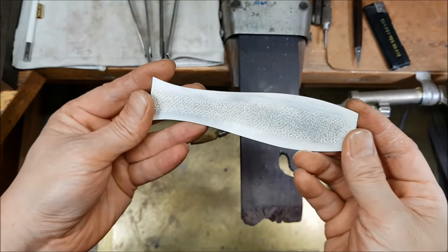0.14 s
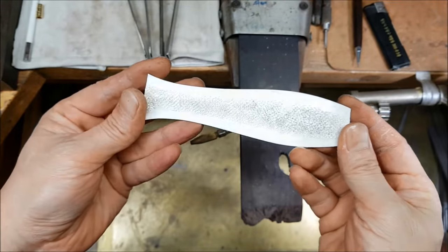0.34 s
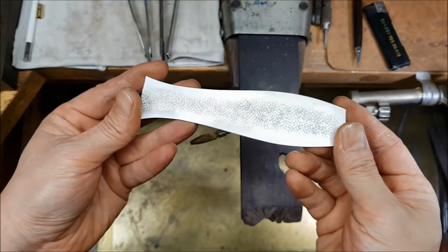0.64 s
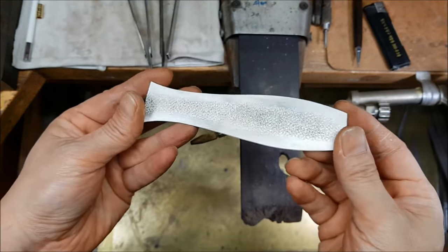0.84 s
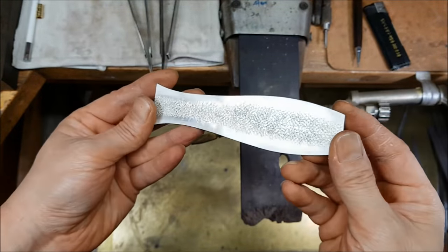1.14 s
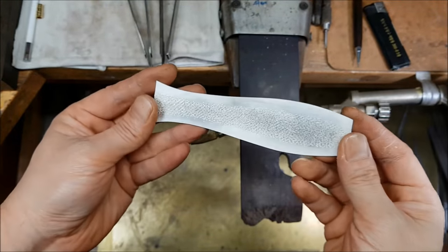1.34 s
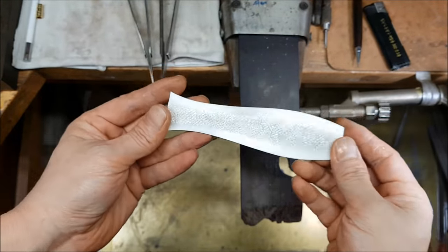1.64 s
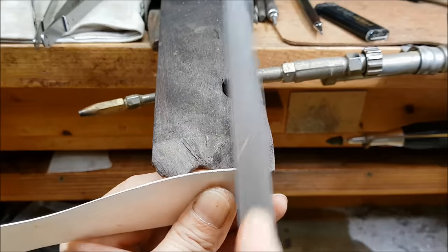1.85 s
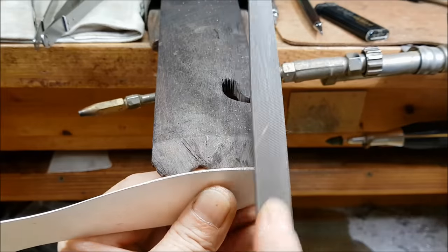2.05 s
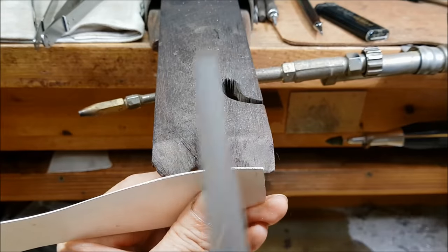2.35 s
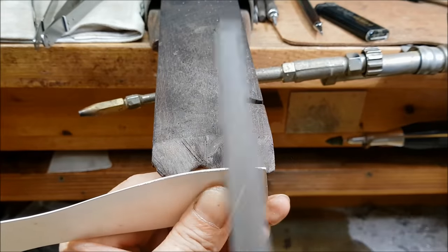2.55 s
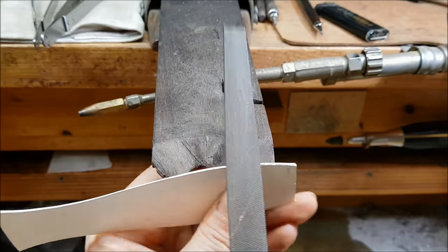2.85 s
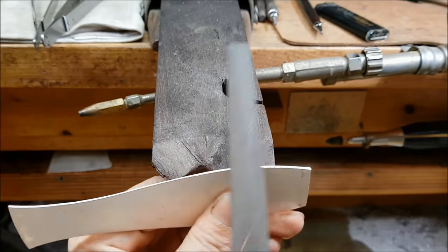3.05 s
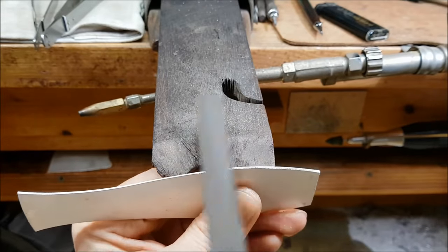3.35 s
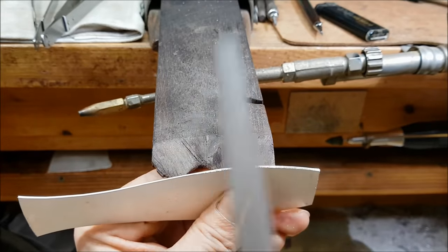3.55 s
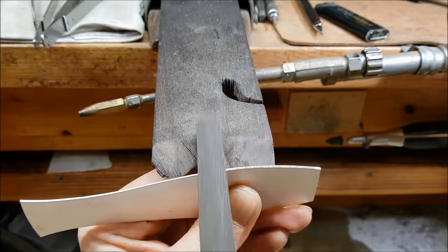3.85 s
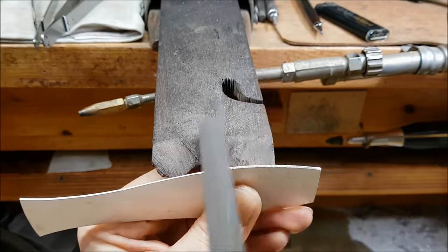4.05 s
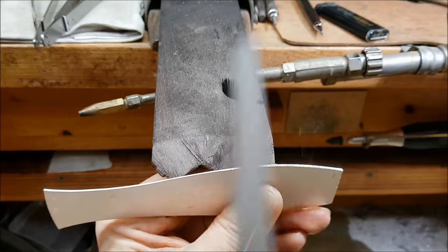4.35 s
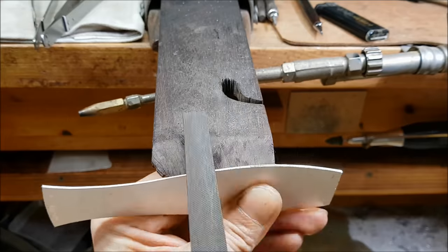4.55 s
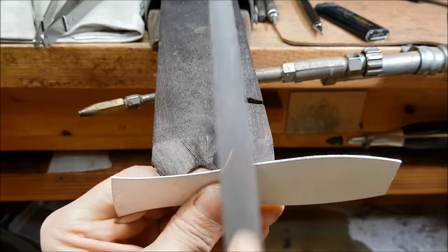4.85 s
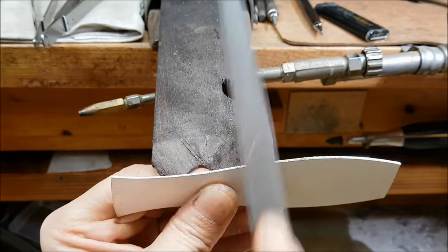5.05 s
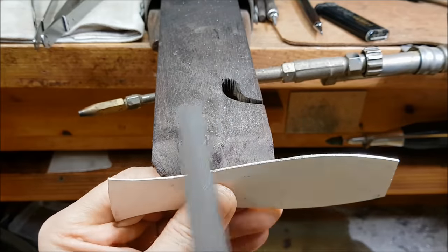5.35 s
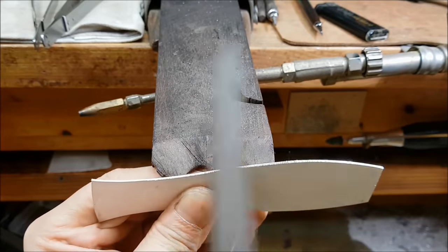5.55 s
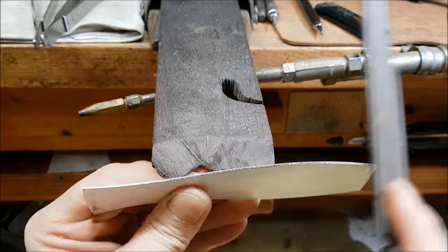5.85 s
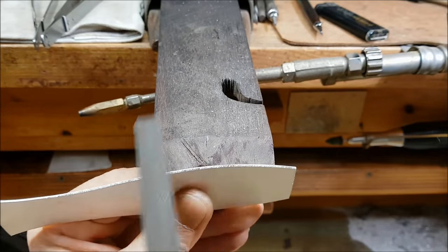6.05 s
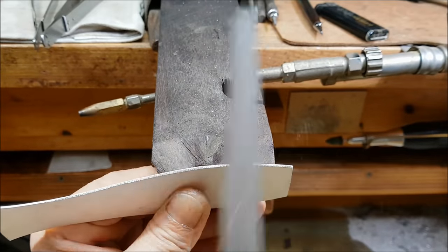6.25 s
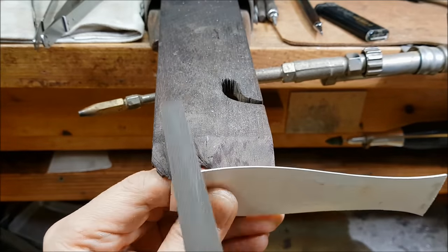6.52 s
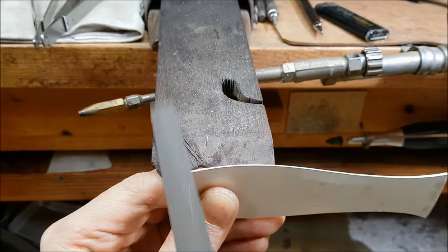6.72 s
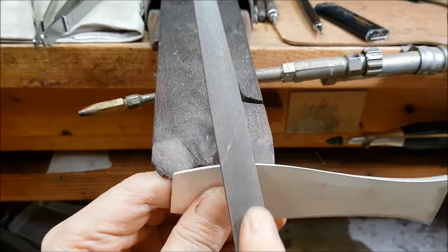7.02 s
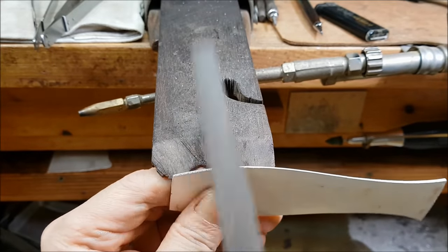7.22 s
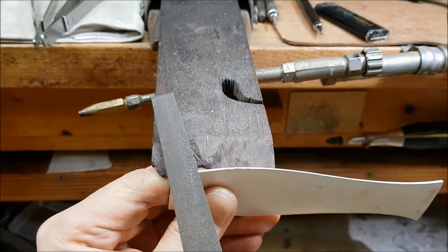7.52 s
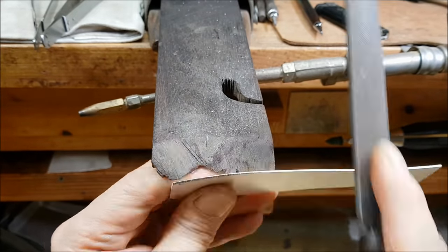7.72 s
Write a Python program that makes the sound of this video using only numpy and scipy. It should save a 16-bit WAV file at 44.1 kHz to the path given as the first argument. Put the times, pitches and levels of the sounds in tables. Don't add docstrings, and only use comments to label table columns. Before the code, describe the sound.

Nearly silent workshop with low hum and two faint double clock ticks, then an abrupt cut to close, loud filing: a hand file rasps to and fro on a thin metal sheet, ringing and hissing. A lift and a tap interrupt it, then steady strokes resume. After another cut the grip is changed, duller and faster, ending with woody slaps against the bench pin. Close stereo microphone, small dry room.

```python
import sys
import numpy as np
from scipy import signal
from scipy.fft import rfft, irfft, next_fast_len
from scipy.io import wavfile
from scipy.ndimage import uniform_filter1d, map_coordinates

SR = 44100
rng = np.random.default_rng(int(sys.argv[2]) if len(sys.argv) > 2 else 0)


def rack_gain(trim_db):
    fader = np.asarray(trim_db, float)
    return 10 ** (fader / 20)


def file_out(sig):
    cols = np.atleast_2d(sig).T
    lim = np.clip(cols, -1, 1)
    pcm = np.round(lim * 32767).astype(np.int16)
    wavfile.write(sys.argv[1], SR, pcm)


N = 347508
TIME = np.arange(N) / SR
REGRIP = 4.83
# fade begins t/s, silent t/s, sound returns t/s
MUTES = [
    (1.76, 1.765, 1.795),
    (4.80, 4.829, 4.831),
    (5.965, 5.972, 6.0),
    (6.598, 6.605, 6.634),
]
# f/Hz, width/Hz, level/dB
SHEET = [
    [(612, 20, 0), (754, 34, -4.5), (941, 30, 0), (1232, 146, 0.5), (1460, 30, 0.5), (1733, 30, 2), (2172, 72, 1), (2495, 69, -2.5), (2970, 210, -5.5), (3430, 170, 3.5), (4530, 270, -0.5)],
    [(620, 60, -13), (977, 58, 2), (1427.7, 81, -2.5), (1772, 154.4, -2), (2255, 44, -0.5), (2577, 53, -0.5), (3250, 250, -6), (3540, 150, -6), (4470, 235, 1.5)],
]
# f/Hz, width/Hz, level/dB
PIN = [(157, 110, -2.5), (287.5, 95, 1.5), (425, 116, 1.5), (643, 40, 0.5), (940, 290, -2.5)]
# f/Hz, t60/s
ROOM = [(200, 0.27), (2000, 0.078), (12000, 0.05)]


def unit(x):
    return x / np.sqrt(np.mean(x ** 2) + 1e-20)


def along(points, hz):
    f, v = np.transpose(points)
    return np.interp(np.log(hz + 1), np.log(f + 1), v)


def filtered(x, response):
    m = next_fast_len(N + 8192)
    return irfft(rfft(x, m) * response(np.fft.rfftfreq(m, 1 / SR)), m)[..., :N]


def coloured(noise, colour):
    return unit(filtered(noise, lambda hz: rack_gain(along(colour, hz))))


def modes(table):
    def response(f):
        total = 0
        for k, (centre, width, db) in enumerate(table):
            resonance = 1j * f * width / (centre * centre - f * f + 1j * f * width)
            total = total + (-1) ** k * rack_gain(db) * resonance
        return total
    return response


def even(response):
    def scaled(hz):
        gain = response(hz)
        return gain / np.sqrt(np.mean(np.abs(gain) ** 2))
    return scaled


def impulses(s, sizes):
    at = np.asarray(s)[:, None] * SR
    index = np.floor(at).astype(int) + np.arange(-5, 7)
    kernel = np.sinc(index - at) * np.cos(np.pi * (index - at) / 14) ** 2
    weights = kernel * np.asarray(sizes)[:, None]
    return np.bincount(np.clip(index, 0, N - 1).ravel(), weights.ravel(), N)


def bursts(events):
    envelope = 0
    for s, db, rise, t60 in events:
        decay = rack_gain(db - 60 * np.abs(TIME - s) / t60)
        envelope = envelope + decay * np.clip((TIME - s) / rise, 0, 1)
    return envelope * rng.standard_normal((2, N))


def reverb(x, decay):
    hz, t, z = signal.stft(rng.standard_normal((2, SR // 3)), SR, nperseg=128)
    tail = signal.istft(z * rack_gain(-60 * t / along(decay, hz)[:, None]), SR, nperseg=128)[1]
    return signal.oaconvolve(x, tail / np.linalg.norm(tail[0]), axes=1)[:, :N]


def hum():
    # t/s, level/dB
    hum_level = [(0, -72.5), (1.77, -70.5), (1.8, -62.5), (2.4, -65), (2.7, -57), (3.3, -60), (3.6, -66),
                 (4.6, -61.5), (5.2, -72), (6.9, -68.5), (7.1, -91), (7.88, -80.5)]
    # f/Hz, level/dB per Hz
    hum_colour = [(20, -72.5), (50, -29.5), (97, -13), (172, -14), (210, -21.5), (500, -38), (780, -72.5),
                  (1320, -120)]
    # f/Hz, level/dB per Hz
    rumble_colour = [(10, -30), (25, -14), (50, 3), (80, -2), (130, -40), (300, -120)]
    common = rng.standard_normal(N)
    steady = coloured(rng.standard_normal((2, N)) + 1.5 * common, hum_colour)
    steady = steady * rack_gain(np.interp(TIME, *np.transpose(hum_level)))
    wide_shot = TIME < MUTES[0][1]
    rumble = rack_gain(-73) * wide_shot * coloured(rng.standard_normal(N), rumble_colour)
    return (rumble + steady) * rack_gain([[-2.1], [2.1]])


def still_air():
    # t/s, level/dB
    air_level = [
        (0, -80.5),
        (1.77, -80),
        (1.8, -63),
        (2.9, -59.5),
        (3.05, -66.5),
        (4.8, -71.5),
        (5.95, -71),
        (7.88, -82),
    ]
    # f/Hz, level/dB per Hz
    air_colour = [(300, -4), (500, -2), (1500, -4), (5000, -9), (9000, -9), (16000, -11)]
    air = coloured(rng.standard_normal((2, N)), [(150, -64.0)] + air_colour)
    return air * rack_gain(np.interp(TIME, *np.transpose(air_level)))


def clock():
    # t/s, peak level/dB, rise/s, t60/s
    tick_events = [
        (.425, -67, .002, .07),
        (.446, -66, .002, 0.065),
        (1.334, -68.5, .002, 0.068),
        (1.355, -65, .002, 0.064),
    ]
    # f/Hz, width/Hz, level/dB
    clock_parts = [(1470, 43, -13), (3500, 110, -5), (3980, 40, -15), (5300, 45, -4), (6300, 86, -5),
                   (7770, 34, -7), (11500, 91, -14)]
    impact = lambda hz: 0.14 * (hz > 1200) * (hz < 8500)
    ticks = rack_gain(19.0) * filtered(bursts(tick_events), lambda hz: modes(clock_parts)(hz) + impact(hz))
    return ticks + rack_gain(1) * reverb(ticks, ROOM)


def strokes():
    # push t/s, pull t/s, push level/dB, pull level/dB, push teeth f/Hz
    bout_1 = [
        (1.788, 1.881, -23.5, -24.5, 1745),
        (1.984, 2.076, -22, -23.5, 2363),
        (2.161, 2.255, -20.5, -24, 2544),
        (2.341, 2.43, -20.0, -23.0, 2459),
        (2.523, 2.614, -20.5, -22.0, 2417),
        (2.697, 2.784, -20.5, -22, 2544),
    ]
    bout_2 = [
        (3.142, 3.237, -32.5, -23, 1676),
        (3.346, 3.444, -23, -23, 2232),
        (3.534, 3.625, -22, -21.5, 1811),
        (3.712, 3.804, -22, -23.5, 1884),
        (3.893, 3.981, -21.5, -21.0, 1882),
        (4.069, 4.158, -19.5, -22.5, 1933),
        (4.248, 4.332, -21, -21, 2047),
        (4.416, 4.501, -23.5, -22.0, 1749),
        (4.59, 4.672, -23.0, -21.0, 1671),
    ]
    bout_3 = [
        (4.801, 4.855, -38, -21, 2165),
        (4.92, 4.978, -23.5, -18.5, 2410),
        (5.036, 5.096, -23, -21, 2471),
        (5.15, 5.206, -20, -21.5, 2979),
        (5.265, 5.317, -25, -23, 2699),
        (5.378, 5.435, -24.5, -22.5, 3036),
        (5.485, 5.548, -25.5, -24.5, 2599),
        (5.602, 5.655, -22, -20, 2840),
        (5.714, 5.773, -18.5, -20.5, 2876),
        (5.82, 5.881, -21.5, -22, 2759),
    ]
    bout_4 = [
        (5.984, 6.038, -23, -23.5, 1281),
        (6.102, 6.164, -22, -22, 1852),
        (6.221, 6.283, -19.5, -22.5, 3766),
        (6.336, 6.4, -18.0, -25.0, 3783),
        (6.448, 6.508, -20.5, -26.0, 3853),
    ]
    bout_5 = [(6.606, 6.621, -67, -19.5, 3194), (6.68, 6.735, -22.5, -20.5, 3250),
              (6.791, 6.85, -21.0, -20, 3179), (6.905, 6.964, -22.0, -25.5, 3363),
              (7.024, 7.085, -24, -25.5, 3550), (7.138, 7.198, -25.0, -24.5, 3176),
              (7.254, 7.318, -23.5, -27, 3297), (7.366, 7.426, -22, -25.5, 3419),
              (7.478, 7.537, -24.5, -27, 2733), (7.588, 7.64, -24.5, -31.5, 2204),
              (7.693, 7.749, -26.5, -28.5, 3086)]
    # lift t/s, scrape at lift/dB, pull teeth f/Hz, slackening grip/dB per s, pin drone/dB
    bouts = [
        (2.854, -49, 1349, -3.8, -18.5),
        (4.782, -73, 1421, -1, -15),
        (5.936, -75, 2096, -7.5, -17.5),
        (6.557, -62, 2101, -2.7, -21),
        (7.807, -100, 1952, -6, -14.5),
    ]
    # ring/dB, rasp/dB, sizzle/dB, scrape at the turn/dB, hardest press at share 0-1
    push_mix = [(-3.5, -6.5, -11.5, -20.5, .62), (-5.5, -3.5, -6.5, -13.5, .65),
                (-1, -7.5, -4.5, -18.5, .6), (-3, -6.5, -5, -18.5, .55), (-6, -7, -4, -34, .5)]
    pull_mix = [(-3, -6.5, -0.5, -46, .6), (-5.5, -6.5, -3, -59.5, .5), (-2.5, -8, -7.5, -34, .45),
                (-5.5, -7, -3, -11, .5), (-2, -7, -8, -22, .5)]
    # ring/dB, rasp/dB, sizzle/dB
    faster = [
        (0.098, -1.5, 7.9),
        (2.5, -6.5, 0),
    ]
    usual_teeth_hz = 2200
    sizzle_gains = 0.24
    rows, scrape_db = [], -120
    for cycles, bout, push, pull in zip([bout_1, bout_2, bout_3, bout_4, bout_5], bouts, push_mix, pull_mix):
        lift, lift_db, pull_hz, fade_db, drone = bout
        per_doubling = np.array(faster[int(lift > REGRIP)])
        for out, back, push_db, pull_db, push_hz in cycles:
            pair = [(out, push_db, push_hz, push), (back, pull_db, pull_hz, pull)]
            for way, (s, db, hz, (ring, rasp, sizzle, turn, hardest)) in enumerate(pair):
                more = np.log2(hz / usual_teeth_hz) * per_doubling
                slack_db = fade_db * (s - cycles[0][0])
                ring_db = db + ring + more[0] + slack_db
                rasp_db = db + rasp + more[1]
                sizzle_db = db + sizzle + more[2] - sizzle_gains * slack_db
                rows.append((s, scrape_db, hardest, rasp_db, sizzle_db, ring_db, hz, drone, way))
                scrape_db = db + turn + slack_db
        scrape_db = lift_db
        rows.append((lift, lift_db, .5, -120, -120, -120, pull_hz, drone, 0))
    idle = rows[-1][1:]
    return np.array([(0.00046, *idle)] + rows + [(N / SR, *idle)])


def hand():
    rows = strokes()
    turns = rows[:, 0]
    gap = np.clip(np.searchsorted(turns, TIME) - 1, 0, len(turns) - 2)
    span, way = np.diff(turns)[gap], rows[gap, -1].astype(int)
    part = np.clip((TIME - turns[gap]) / span, 0, 1)
    speed_up, slow_down = np.take((.011, .008), way), np.take((.008, .015), way)
    speed = np.tanh(part * span / speed_up) ** 2.8 * np.tanh((1 - part) * span / slow_down) ** 1.8
    bent = part ** (np.log(.5) / np.log(np.clip(rows[gap, 2], .15, .85)))
    touching = rows[gap, 3] > -100
    drag = touching * rack_gain(np.interp(TIME, turns, rows[:, 1]))
    return speed, np.sin(np.pi * bent), drag, rows[gap, 3:-1].T


def teeth(rate_hz, slack, scatter_db):
    passed = np.cumsum(rate_hz) / SR
    chance = rng.standard_normal((30000, 2))
    tooth = np.arange(len(chance))
    rate_at_tooth = np.interp(np.interp(tooth, passed, TIME), TIME, rate_hz)
    loose = slack * (2000 / rate_at_tooth) ** .7
    spacing = np.clip(1 + loose * chance[:, 0], .15, 3)
    s = np.interp(np.cumsum(spacing), passed, TIME)
    size = rack_gain(scatter_db * chance[:, 1]) * (s < TIME[-1])
    ripple = np.interp(TIME, s, size) * np.sin(2 * np.pi * np.interp(TIME, s, tooth))
    clicks = impulses(s, size) / np.sqrt(rate_hz)
    return unit(ripple), unit(clicks)


def shifting(x, depth_db):
    z = signal.stft(x, nperseg=512)[2]
    field = uniform_filter1d(rng.standard_normal(z.shape[1:]), size=4, axis=0)
    field = uniform_filter1d(field, size=6, axis=1)
    gain_db = depth_db * unit(field) - depth_db ** 2 * np.log(10) / 20
    return signal.istft(z * rack_gain(gain_db), nperseg=512)[1][:, :N]


def ports(pair, lean):
    # f/Hz, coherence 0-1
    alike = [(150, .5), (300, .7), (700, .85), (1400, .7), (2400, .6), (5000, .65), (9000, .8),
             (15000, .55)]
    # f/Hz, phase scatter/rad
    phase_scatter = [(300, .05), (1500, 0.16), (2500, 2.1), (6000, 0.48), (15000, 0.81)]
    lead = 2.6 / SR
    turn = lambda hz: np.arccos(np.clip(along(alike, hz), 0, 1)) / 2
    mid, side = filtered(pair, lambda hz: np.array([np.cos(turn(hz)), np.sin(turn(hz))]))
    knots = rng.standard_normal(400)

    def left_right(hz):
        scatter = along(phase_scatter, hz) * map_coordinates(knots, [hz / 105], mode="mirror")
        half = rack_gain(along(lean, hz) / 2) * np.exp(.5j * (2 * np.pi * lead * hz + scatter))
        return np.array([half, 1 / half])
    return filtered(np.array([mid + side, mid - side]), left_right)


def filing():
    # f/Hz, level/dB per Hz
    rasp_colour = [
        [(1470, -8), (2500, -1.5), (3470, -4.5), (5600, -5.5), (7260, -9), (11000, -25), (14300, -59)],
        [(1470, -10.5), (2500, 0.5), (4200, 3), (6300, -4.5), (7310, -13.5), (11000, -20), (14300, -33.5)],
    ]
    sizzle_colour = [
        [(6000, -4), (10000, -2.5), (12000, -3.5), (13300, -1), (15400, 2.5), (16000, -23.5), (16400, -53)],
        [(6000, -5), (10000, -3), (12300, -7), (14900, -11), (15800, -11.5), (16100, -42), (16400, -46)],
    ]
    # f/Hz, left over right level/dB
    lean = [
        [(60, -5), (150, 7.5), (380, -4.5), (950, 2), (2380, 3.5), (5980, 1), (15000, 10)],
        [(60, 8.5), (150, 8.5), (380, -3), (950, 0.5), (2380, 2), (5980, 1), (15000, 4.5)],
    ]
    growth = [
        (.95, 1.4),
        (.95, 1.05),
    ]
    speed, press, drag, (rasp_db, sizzle_db, ring_db, teeth_hz, drone_db) = hand()
    rate_hz = 2050 * (teeth_hz / 1900) ** 1.4 * (.55 + .45 * speed ** .4 * press ** .4)
    both_ports = [teeth(rate_hz, slack=.38, scatter_db=2.5) for port in "LR"]
    ripple, clicks = np.transpose(both_ports, (1, 0, 2))
    swarf = rng.standard_normal((2, N))
    clots = rack_gain(map_coordinates(rng.standard_normal(N // 300), [TIME * 110], mode="mirror"))
    shake = shifting(unit(ripple + .6 * swarf) * clots ** 1.1, depth_db=3)
    blade = unit(.7 * clicks + .6 * ripple[::-1] + rng.standard_normal((2, N)))
    hiss = shifting(blade * clots ** 1.1, depth_db=2.2)
    sound = 0
    for grip, held in enumerate([TIME < MUTES[1][0], TIME >= REGRIP]):
        rasp_power, sizzle_power = growth[grip]
        damped = np.add(SHEET[grip], [0, 40, 0])
        rasp = even(lambda hz: rack_gain(along([(500, -41.5)] + rasp_colour[grip], hz)))
        sizzle = even(lambda hz: rack_gain(along([(2500, -68.5)] + sizzle_colour[grip], hz)))
        push = held * (rack_gain(ring_db - 6.0) * press ** 0.42 + 0.35 * drag)
        rasp_level = rack_gain(rasp_db - 0.45) * speed ** rasp_power + 0.5 * drag
        sizzle_level = rack_gain(sizzle_db + 2.6) * speed ** sizzle_power + 0.053 * drag
        drone = rack_gain(drone_db) * swarf * clots ** 2.0 * push
        edge = filtered(shake * push, even(modes(damped)))
        edge += filtered(drone, even(modes(PIN[1 + grip:3 + grip])))
        edge += filtered(held * hiss * rasp_level, rasp)
        edge += filtered(held * hiss * sizzle_level, sizzle)
        sound += ports(edge, lean[grip])
    return sound


def file_taps():
    # t/s, peak level/dB, rise/s, t60/s
    tap_events = [
        (2.962, -22.5, 0.0017, 0.038),
        (3.071, -45.5, 0.005, 0.083),
    ]
    broad = np.add(SHEET[0], [0, 150, 0])
    body = lambda hz: 0.69 * (hz > 300) + 1.2 * modes(PIN)(hz) + 1.224 * modes(broad)(hz)
    return filtered(bursts(tap_events), body) * rack_gain([[1.5], [-1.5]])


def pin_slaps():
    # t/s, peak level/dB
    slap_events = [
        (6.932, -34),
        (7.036, -35),
        (7.288, -39.5),
        (7.394, -33),
        (7.499, -28.5),
        (7.602, -28.5),
        (7.609, -26),
        (7.713, -37.5),
    ]
    s, db = np.transpose(slap_events)
    high_pass = lambda hz: 1j * hz / (90 + 1j * hz)
    slaps = filtered(impulses(s + 0.0049, rack_gain(db + 35)), lambda hz: modes(PIN)(hz) * high_pass(hz))
    return slaps * rack_gain([[5.5], [-29]])


def scene():
    # f/Hz, t60/s
    near = [(300, .06), (3000, .045), (12000, .03)]
    workshop = hum() + still_air() + clock()
    slaps = pin_slaps()
    bench = filing() + file_taps() + 0.13 * slaps
    echoes = rack_gain(-15) * reverb(bench, near) + rack_gain(-38) * reverb(bench, ROOM)
    return bench + echoes + slaps + workshop


def low_pass(x):
    return signal.sosfilt(signal.butter(12, 16850, fs=SR, output="sos"), x)


def record(dry):
    top_hz = 16450
    fades = [np.interp(TIME, [a, b, c - .001, c], [1, 0, 0, 1]) for a, b, c in MUTES]
    gate = np.prod(fades, axis=0)
    limited = filtered(dry * gate, lambda hz: np.clip((top_hz - hz) / 300, 0, 1))
    return low_pass(limited)


dry = scene()
out = record(dry)
file_out(out)
```